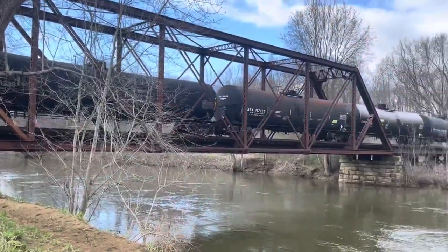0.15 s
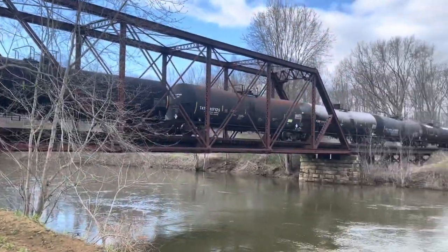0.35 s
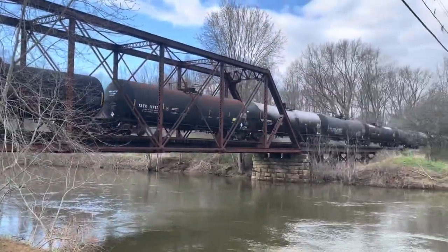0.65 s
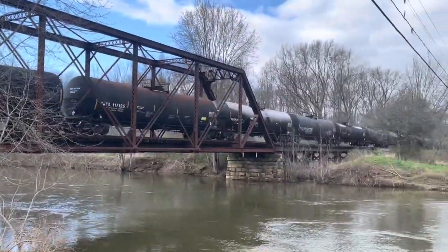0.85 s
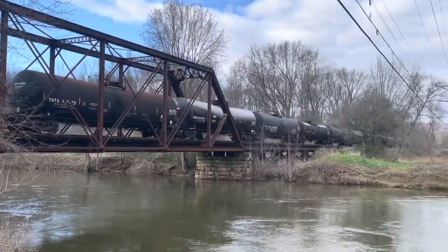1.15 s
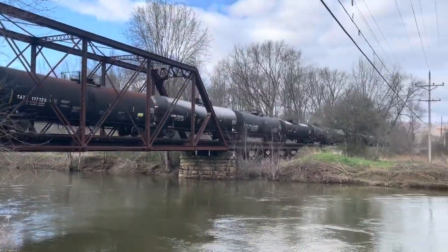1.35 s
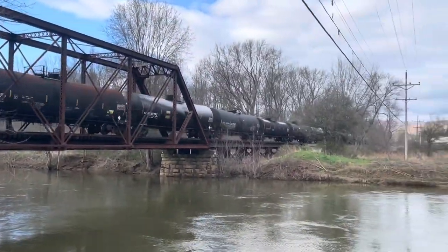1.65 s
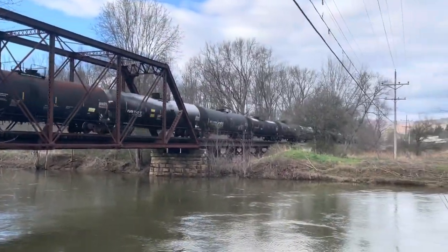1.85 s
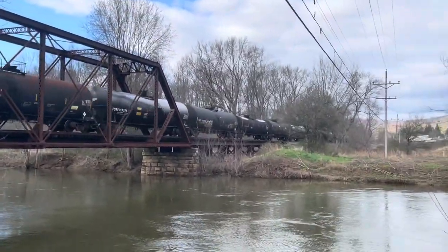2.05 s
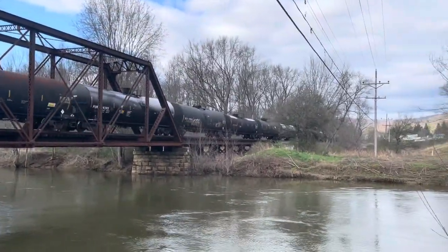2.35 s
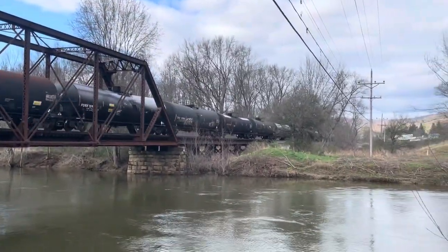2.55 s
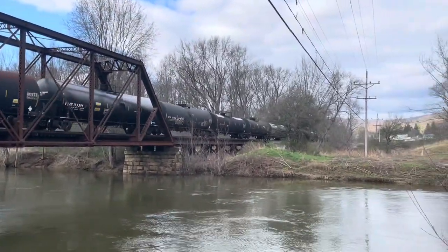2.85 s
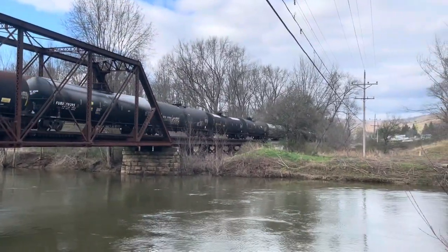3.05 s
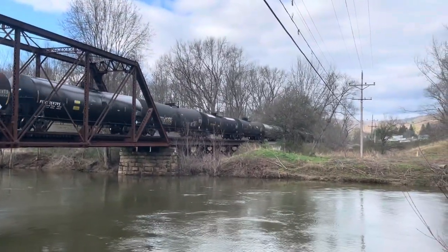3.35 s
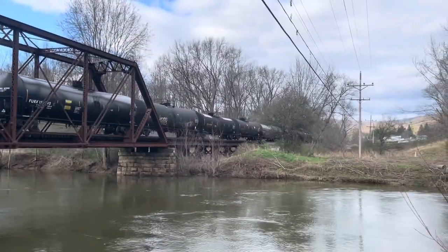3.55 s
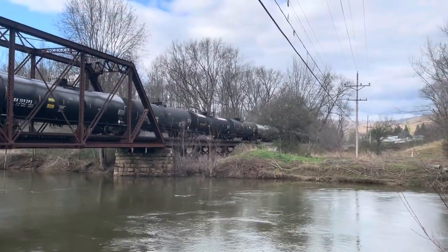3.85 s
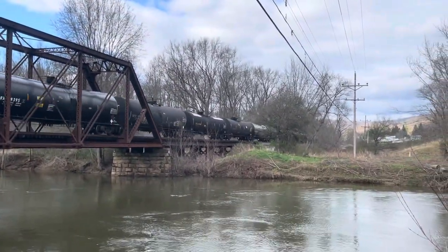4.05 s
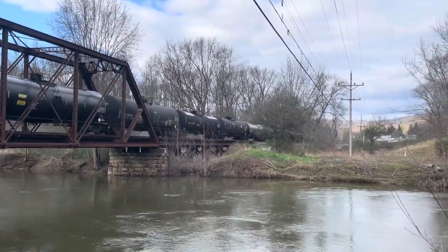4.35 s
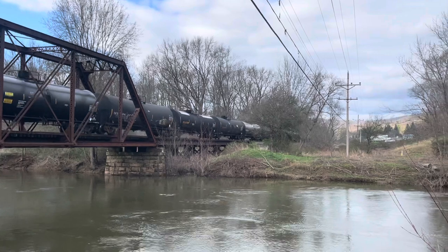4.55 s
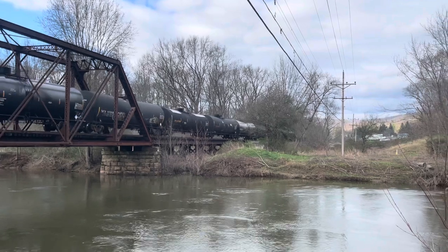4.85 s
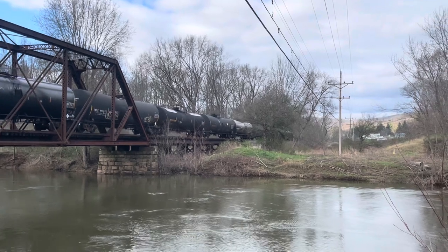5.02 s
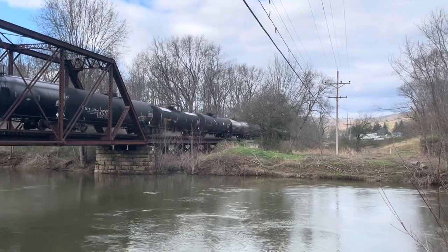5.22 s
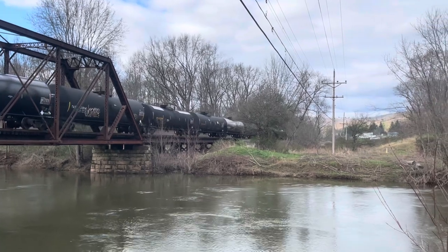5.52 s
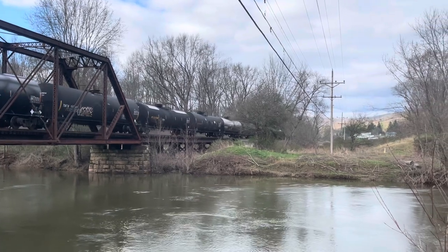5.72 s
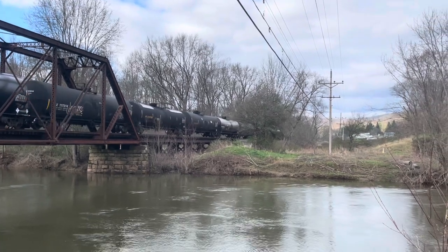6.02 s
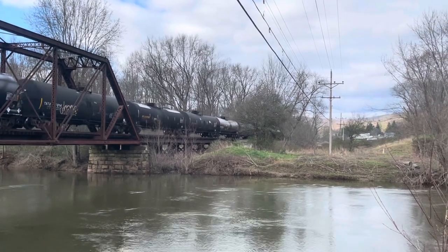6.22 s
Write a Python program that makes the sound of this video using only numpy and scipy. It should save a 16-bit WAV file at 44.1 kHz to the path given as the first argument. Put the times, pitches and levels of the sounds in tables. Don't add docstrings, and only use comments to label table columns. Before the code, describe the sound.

From 0 to about 6.4 seconds, a slow freight train is already crossing a steel bridge by a river, with no fade in or out. A low rumble around 60 to 120 Hz and midrange wheel roar fluctuate constantly, topped by fine steel scraping and airy hiss. At 0.1 to 0.3 s a thin high flange squeal chirps. Knocks and short clanks, mostly 500 to 1100 Hz, fall irregularly several times a second. At 1.16 s a coupler slams, dry and hard, loudest of all. Knocks continue around 2.4 s and 3 s with bright plate rattles. A deep thump lands near 3.9 s; from 4.2 to 4.6 s hoarse grinding and clustered girder thuds build up. Faint squeals and stronger hiss follow from 5.2 s, with another heavy thump at 5.8 s and clattering through the end. Close, open-air phone perspective, short diffuse bank reflections.

```python
import sys
import numpy as np
from scipy import signal
from scipy.fft import rfft, irfft, next_fast_len
from scipy.io import wavfile
from scipy.ndimage import uniform_filter1d

SR = 44100
rng = np.random.default_rng(int(sys.argv[2]) if len(sys.argv) > 2 else 0)


def to_wav(s):
    ch = np.atleast_2d(s).T
    pcm = np.round(np.clip(ch, -1, 1) * 32767)
    wavfile.write(sys.argv[1], SR, pcm.astype(np.int16))


def convert_level_to_amplitude(level_db):
    exponent = np.asarray(level_db, float) / 20
    return 10 ** exponent


N = 281259
TIME = np.arange(N) / SR
SIZE = next_fast_len(N)
HZ = np.arange(SIZE // 2 + 1) * SR / SIZE + 1e-3


def at_level(x, db):
    return x * convert_level_to_amplitude(db) / np.sqrt(np.mean(x ** 2))


def along(table, column=1):
    table = np.array(table)
    return np.interp(np.log(HZ), np.log(table[:, 0]), table[:, column])


def shape(x, gain):
    return irfft(rfft(x, SIZE) * gain, SIZE)[:N]


def resonance(hz, width_hz, at):
    return 1 / (1 + 1j * (at - hz ** 2 / at) / width_hz)


def walk(rate_hz):
    hold = int(SR / rate_hz)
    steps = np.repeat(rng.standard_normal(N // hold + 1), hold)
    slow = uniform_filter1d(uniform_filter1d(steps, hold), hold)[:N]
    return slow / slow.std()


def add(out, s, sound):
    i = int(s * SR)
    out[i:i + len(sound)] += sound[:len(out) - i]


def pings(count, lowest_hz, octaves, t60=0.1, spread_db=2):
    out, t = np.zeros(SIZE), np.arange(3000) / SR
    fade = (1 - np.exp(-t / 0.00072)) * convert_level_to_amplitude(-60 * t / t60)
    for when, pitch, size in rng.random((count, 3)):
        hz = lowest_hz * 2 ** (octaves * pitch)
        loudness = convert_level_to_amplitude(-spread_db * np.log(size + 0.039))
        add(out, when * N / SR, loudness * fade * np.sin(2 * np.pi * hz * t))
    return out


def swells(table):
    out = np.zeros((len(table[0]) - 2, N))
    for s, length, *db in table:
        span = slice(max(int((s - length / 2) * SR), 0), int((s + length / 2) * SR))
        out[:, span] += np.outer(db, np.cos(np.pi * (TIME[span] - s) / length) ** 2)
    return out


# t/s, level/dB
WEIGHT = [(0.0, -0.2), (.58, 3), (1.16, -1.04), (1.74, -0.56), (2.32, -2.5), (2.9, -1.6), (3.48, -4),
          (4.06, 2.5), (4.64, 4), (5.22, 2), (5.8, 0.2), (6.38, 4)]
FOLLOWS = [1.17, 1.7, 0.19, 1.5, 1.23, -0.55]
# middle t/s, length/s, swell level/dB
BOOMS = [(.15, .13, -1), (.3, 0.12, -5), (.4, 0.15, 3), (.85, .4, 1), (1.11, 0.067, -6), (1.26, 0.29, 7.5),
         (1.59, 0.37, 5), (1.85, 0.28, 3), (2.19, 0.2, 5.5), (2.51, 0.14, 2.5), (3.6, 0.15, -6),
         (3.79, 0.34, 6), (3.9, .18, 5), (4.24, .12, 6), (4.38, 0.064, -1), (4.42, 0.32, 7),
         (4.56, 0.11, 6), (5.08, .4, 1), (4.6, .06, -4), (5.5, 0.087, 5), (5.91, 0.26, 3.5)]
# middle t/s, length/s, deck swell level/dB, rail swell level/dB
ROUGH_RAIL = [(0.11, 0.26, 1.5, 2.5), (0.37, 0.089, -1, -5), (0.66, 0.067, 1, 4), (0.83, 0.11, 3.5, -1),
              (0.96, 0.41, 10, 5), (1.23, 0.3, 6.5, 6), (1.56, 0.092, 6.5, 5), (1.74, 0.12, 6, 2.0),
              (1.88, 0.12, 12, 0.5), (2.12, 0.3, 10, 9), (2.48, 0.38, 3, 3), (2.65, 0.17, 4, 1.5),
              (2.84, 0.17, -2, 4), (3.03, 0.26, 4.5, 7), (3.33, 0.57, 7, 6.5), (3.71, 0.39, 11, 10),
              (3.88, 0.15, 3, 2), (4.01, 0.1, 5, 2), (4.24, 0.7, 5, 3), (4.58, 0.46, 3, 5),
              (4.96, 0.41, 5, 9), (5.48, 0.13, 8.5, 4.5), (5.84, 0.39, 9, 7.5), (5.98, 0.35, 3.5, -3),
              (6.18, 0.34, 8.5, 3.5), (.73, 0.089, -4, -7), (2.365, 0.072, -2, -2), (2.965, 0.075, -6, -5),
              (3.57, .08, -5.5, -2), (4.5, 0.068, -7, -7), (2.27, .16, 4, 0), (5.64, .2, 4, 0),
              (3.2, .12, -4, 0), (5.77, 0.075, -5, -4)]
# middle t/s, length/s, scrape swell level/dB, hiss swell level/dB
FLANGE_RUBS = [(0.17, 0.65, 4, 7), (0.54, 0.15, 3.0, 10), (0.99, 0.35, 2.5, 4.5), (1.18, 0.29, 3.5, 3),
               (1.36, 0.44, 5.5, 5), (1.57, 0.16, 4.5, 8), (1.76, 0.51, 4, 4), (2.08, 0.31, 10.5, 9),
               (2.47, 0.33, 6, 8.5), (2.63, 0.046, 1.5, 8), (2.82, 0.15, 5.5, 6), (3.03, 0.42, 2.0, 7),
               (3.29, 0.41, 1.5, 6.5), (3.63, 0.17, 3.5, 5.5), (3.78, 0.29, 4.5, 5), (3.98, 0.048, 6.5, 12),
               (4.208, 0.1, 6.5, 12), (4.31, 0.17, 6.5, 9), (4.58, 0.12, 1.5, 3), (4.83, 0.24, 5, 5),
               (4.96, 0.15, 5.5, 11), (5.16, 0.44, 2, 10), (5.47, 0.41, 4, 10.5), (5.73, 0.36, 6, 11),
               (6.0, 0.45, 4.5, 11), (6.23, 0.39, 4.5, 11)]
# middle t/s, length/s, scrape level/dB, hiss level/dB
FLANGE_LIFTS = [
    (1.1, 0.074, -5, -4),
    (2.3, 0.15, -0.5, -1.5),
    (2.58, 0.1, -3, -9),
    (3.553, .12, -2.5, 3),
    (3.902, 0.13, -1, -9),
    (4.107, 0.16, -2, -10),
    (4.44, 0.24, -2, -5),
]


def shaking():
    girders, = swells(BOOMS)
    deck, rail = swells(ROUGH_RAIL)
    scrape, hiss = swells(FLANGE_RUBS + FLANGE_LIFTS)
    discs = 0.26 * rail + 0.88 * scrape
    weight_db = np.interp(TIME, *np.transpose(WEIGHT))
    return np.array([girders, deck, rail, discs, scrape, hiss]) + np.outer(FOLLOWS, weight_db)


PART_HZ = [120, 560, 930, 2200]
# f/Hz, level/dB
ROLLING_COLOUR = [(15, -41), (25, -25.5), (59, -1), (117, -0.5), (178, -6.5), (269, -8), (331, -6),
                  (468, -9), (833, -9.5), (957, -4), (1480, -13.5), (1700, -19), (2410, -22.5),
                  (6200, -36.5), (8060, -49), (13600, -120)]
# f/Hz, width/Hz, level/dB
RINGING = [
    (118, 31, -3),
    (700, 17.5, -1.5),
    (1000, 22, -27),
    (1150, 44, -11.5),
    (1950, 127, -1),
    (2420, 160, -4),
    (2690, 180, -2.5),
]
# f/Hz, width/Hz, depth 0-1
WATER_DIP = (1650, 99, 0.38)


def rolling(drive_db, ping_db=-15, shared_db=0.81, own_db=1.17, depth=0.89):
    mean_db = 10 * np.log10(np.mean(10 ** (drive_db / 10), axis=1, keepdims=True))
    swing = depth * (drive_db - mean_db)
    grain = rng.standard_normal(SIZE) + convert_level_to_amplitude(ping_db) * pings(count=900, lowest_hz=600, octaves=2.3)
    modes = sum(convert_level_to_amplitude(db) * np.abs(resonance(hz, width, HZ)) for hz, width, db in RINGING)
    dip_hz, dip_width_hz, dip_depth = WATER_DIP
    mirror = 1 - dip_depth * np.abs(resonance(dip_hz, dip_width_hz, HZ)) ** 2
    rough = rfft(grain) * convert_level_to_amplitude(along(ROLLING_COLOUR)) * (1 + modes) * mirror
    out, shared = 0, walk(10)
    for hz in 25 * 2 ** (np.arange(23) / 3):
        slot = np.cos(np.pi / 2 * np.clip(3 * np.log2(HZ / hz), -1, 1)) ** 2
        nearness = [np.interp(np.log(hz), np.log(PART_HZ), part) for part in np.eye(len(PART_HZ))]
        band_db = nearness @ swing + shared_db * shared + own_db * walk(18)
        out = out + irfft(rough * slot, SIZE)[:N] * convert_level_to_amplitude(band_db)
    return at_level(out, -32.5)


# f/Hz, level/dB
SCRAPE_COLOUR = [(2500, -14.5), (3300, -2.5), (4500, -3), (6000, -4.5), (7500, -5.5), (8200, -11.5),
                 (9000, -31)]
# f/Hz, level/dB
HISS_COLOUR = [(6000, -24.5), (7500, -16), (8500, -2), (9500, -4), (11000, -12), (13000, -28), (14000, -43),
               (14600, -55), (15300, -66)]


def sliding(drive_db, ping_db=-11, scrape_db=-54, hiss_db=-67):
    ringing = pings(count=1500, lowest_hz=2995, octaves=2.2)[:N]
    grain = rng.standard_normal(N) + convert_level_to_amplitude(ping_db) * ringing
    flutter = convert_level_to_amplitude(1.04 * walk(30) + 1.2 * walk(15))
    scrape = at_level(shape(grain, convert_level_to_amplitude(along(SCRAPE_COLOUR))), scrape_db)
    hiss = at_level(shape(grain, convert_level_to_amplitude(along(HISS_COLOUR))), hiss_db)
    return flutter * np.sum([scrape, hiss] * convert_level_to_amplitude(drive_db), axis=0)


# t/s, length/s, f/Hz, width/Hz, level/dB
SQUEALS = [(.112, 0.051, 4680, 30, -46), (.14, .09, 4705, 25, -42.5), (.2, .11, 4660, 35, -50),
           (.11, .05, 3400, 60, -53), (.11, .12, 6546, 60, -62), (.138, 0.05, 7420, 60, -45),
           (0.17, 0.068, 7350, 60, -47), (.106, .03, 9010, 43, -49), (.138, .025, 9000, 70, -50),
           (0.18, .045, 9010, 70, -54), (0.15, .05, 10700, 60, -57), (1.627, .05, 11600, 80, -86),
           (2.617, 0.1, 10050, 80, -65), (5.17, 0.16, 5710, 44, -57.5), (5.38, 0.31, 6400, 40, -52),
           (5.49, 0.18, 2510, 53, -45), (6.8, 0.17, 2360, 54, -45), (5.67, 0.15, 2100, 70, -46),
           (5.98, .1, 4620, 70, -55), (6.03, .09, 2800, 70, -48), (6.23, 0.15, 2300, 80, -46),
           (5.3, .3, 2975, 66, -58), (5.3, 0.33, 2000, 94, -62), (5.4, 0.3, 2900, 940, -44.5),
           (1.4, 0.33, 2400, 200, -47.5), (2.462, 0.11, 2720, 150, -48), (3.178, 0.037, 2130, 200, -43),
           (0.001, .09, 3500, 700, -48), (4.4, 0.24, 1500, 320, -44.5), (5.68, 0.071, 1800, 330, -38),
           (4.2, 0.07, 2650, 810, -35), (4.26, 0.15, 2600, 540, -38.5), (4.27, 0.12, 3600, 950, -40.5),
           (4.27, 0.12, 1400, 330, -34), (5.6, 0.045, 1600, 200, -47), (.46, 0.2, 4600, 1700, -47.5),
           (6.198, 0.074, 11320, 50, -56)]


def squeals(edge_s=.015, steady_hz=32, sag_per_s=.03):
    out = np.zeros(N)
    for s, length, hz, width_hz, db in SQUEALS:
        t = np.arange(int(length * SR)) / SR
        span = int(SR / width_hz / 1.6)
        noise = rng.standard_normal((2, 16384))
        slip = uniform_filter1d(uniform_filter1d(noise, span), span)[:, :len(t)] * span ** .5
        gate = np.clip(np.minimum(t / edge_s, 1.3 * (1 - t / length)), 0, 1)
        phase = 2 * np.pi * hz * (t - sag_per_s * t ** 2 / 2)
        tone = (steady_hz / width_hz + slip[0]) * np.sin(phase) + slip[1] * np.cos(phase)
        add(out, s, gate * at_level(tone, db))
    return out


def single_modes(table, rise_s, t60, gain_db):
    out, t = np.zeros(N), np.arange(6000) / SR
    fade = (1 - np.exp(-t / rise_s)) ** 2 * convert_level_to_amplitude(-60 * t / t60)
    for s, db, hz in table:
        tone = fade / fade.max() * np.sin(2 * np.pi * hz * t)
        add(out, s - 2.4 * rise_s, convert_level_to_amplitude(db + gain_db) * tone)
    return out


# loudest t/s, peak level/dB, f/Hz
CLANKS = [(0.102, -38.5, 900), (0.314, -36.5, 734), (0.353, -40, 730), (0.482, -40, 1010),
          (0.521, -36.5, 344), (0.537, -35.5, 975), (0.564, -37, 620), (0.579, -38, 1435),
          (0.886, -35, 1025), (1.009, -29, 650), (1.253, -32, 1130), (1.374, -37.5, 970), (1.672, -36, 800),
          (2.035, -31, 967), (2.064, -37.5, 1540), (2.1, -39, 1500), (2.302, -37.5, 970), (2.448, -33, 820),
          (2.523, -30, 971), (2.627, -36, 983), (2.881, -34.5, 983), (2.998, -32, 930),
          (3.141, -31.5, 1003), (3.261, -32, 946), (3.288, -34.5, 950), (3.364, -34, 1025),
          (3.67, -31, 803), (3.804, -37, 733), (3.863, -38, 1050), (4.108, -33, 600), (4.135, -40, 1530),
          (4.158, -32, 956), (4.22, -33, 657), (4.237, -40, 2650), (4.295, -37, 650), (4.325, -34.5, 1110),
          (4.391, -38, 1460), (4.475, -37, 1027), (4.475, -29.5, 666), (4.572, -30.5, 930),
          (4.638, -32, 550), (4.705, -35, 1010), (4.824, -31.5, 1060), (4.828, -36, 1860),
          (5.154, -37, 1133), (5.356, -32.5, 750), (5.406, -31.5, 954), (5.475, -28, 723), (5.5, -42, 2330),
          (5.742, -36, 557), (5.744, -37, 1165), (5.931, -42.5, 1910), (5.992, -37, 1013),
          (6.055, -34, 670), (6.06, -33, 990), (6.106, -40, 2390), (6.115, -31.5, 390), (6.175, -42, 1840),
          (6.232, -34, 1154), (6.257, -32, 1064)]


def clanks():
    return single_modes(CLANKS, rise_s=.003, t60=.075, gain_db=4.04)


def blows(table, sharp, rise_s, gain_db, strike=1.4):
    out, t = np.zeros(N), np.arange(16384) / SR
    at = np.arange(len(t) // 2 + 1) * SR / len(t) + 1e-3
    for s, db, hz, t60 in table:
        fade = (1 - np.exp(-t / rise_s)) * convert_level_to_amplitude(-60 * t / np.clip(t60, .02, .4))
        chatter = rng.standard_normal(len(t)) * fade
        chatter[int(rise_s * SR)] += strike * np.sqrt(SR / hz)
        burst = irfft(rfft(chatter) * resonance(hz, hz / sharp, at) ** 2)
        add(out, s, burst * convert_level_to_amplitude(db + gain_db) / np.abs(burst).max())
    return out


# t/s, peak level/dB, f/Hz, t60/s
KNOCKS = [(0.145, -23, 920, 0.16), (0.281, -20, 970, 0.088), (0.433, -25.5, 1040, 0.2),
          (0.644, -19.5, 550, 0.15), (0.763, -19.5, 910, 0.082), (0.923, -16, 840, 0.09),
          (1.007, -20, 647, 0.1), (1.135, -22, 883, 0.13), (1.568, -22, 993, 0.13), (1.627, -24, 1020, .08),
          (1.784, -27, 966, .1), (2.019, -27, 1040, .15), (2.104, -22, 990, .1), (2.43, -25, 764, 0.11),
          (2.623, -23, 1010, 0.11), (3.055, -21, 1020, .08), (3.121, -22, 1100, 0.11),
          (3.285, -20, 804, .15), (3.36, -22, 1010, 0.19), (3.43, -25, 750, .1), (3.606, -23, 964, .15),
          (4.898, -21, 660, .1), (4.938, -18, 980, .1), (5.441, -21, 966, .08), (5.34, -22, 730, 0.17),
          (4.97, -21, 343, 0.19), (5.8, -19, 974, 0.17), (5.895, -26, 900, .1), (6.289, -18, 958, .1),
          (1.872, -18, 710, 0.032), (2.135, -22, 1060, 0.12), (2.407, -15.5, 885, 0.23),
          (2.508, -18.5, 920, 0.29), (2.774, -20.5, 890, 0.28), (2.903, -19.5, 890, 0.14),
          (2.995, -21.5, 533, 0.19), (3.655, -25, 477, 0.15), (3.748, -19.5, 1150, 0.16),
          (3.996, -18, 550, 0.11), (4.154, -19, 970, 0.084), (4.459, -20, 660, 0.092),
          (4.524, -16.5, 550, 0.17), (4.57, -22, 370, 0.2), (4.606, -15.5, 600, 0.045),
          (4.83, -19.5, 700, 0.25), (4.947, -19, 318, 0.22), (5.107, -20, 724, 0.13),
          (5.31, -22, 834, 0.27), (5.47, -18, 700, 0.1), (5.808, -17.5, 850, 0.15),
          (6.051, -25, 680, 0.056), (6.174, -19.5, 490, 0.22), (6.24, -20, 251, .2)]


def knocks():
    return blows(KNOCKS, sharp=3.03, rise_s=0.00168, gain_db=-5.5)


# t/s, peak level/dB, f/Hz, t60/s
THUMPS = [(0.266, -22.5, 81.5, 0.39), (0.39, -21, 90, 0.2), (0.928, -22.5, 107, 0.3),
          (1.284, -23, 109, 0.29), (1.344, -22, 128, 0.45), (1.637, -29, 115, 0.55), (2.151, -28, 130, 0.3),
          (3.754, -21, 98, 0.23), (3.875, -15, 131, 0.2), (4.018, -33, 67, 0.17), (4.224, -24, 96, 0.27),
          (4.34, -25, 114, 0.2), (4.438, -22, 89.5, 0.18), (4.536, -21, 124, 0.16), (5.051, -32, 115, 0.33),
          (5.473, -26, 70, 0.16), (5.632, -33, 111, 0.42), (5.84, -15.5, 125, 0.43), (5.931, -22, 79, 0.3),
          (6.122, -21, 110, 0.26)]


def thumps():
    return blows(THUMPS, sharp=4.3, rise_s=0.0032, gain_db=-9.0)


# t/s, peak level/dB, f/Hz, t60/s
RATTLES = [(0.2942, -28, 2150, 0.2), (0.4354, -24, 1760, 0.093), (0.9993, -23, 1760, 0.13),
           (1.5434, -27, 1930, 0.13), (1.73, -36, 2080, 0.21), (2.0163, -25, 1710, 0.088),
           (0.9203, -27, 1900, .08), (1.1722, -24, 1890, .08), (2.0911, -30, 1840, .1),
           (2.4044, -29, 1990, .1), (2.7786, -34, 1910, 0.074), (2.816, -25, 1840, .1),
           (2.81, -32, 3800, .12), (4.0726, -29, 1890, .06), (4.8264, -26, 3800, .1),
           (4.9402, -30, 1870, .08), (5.455, -27, 2330, .1), (5.8925, -29, 2340, 0.11),
           (6.097, -26, 4000, 0.088), (6.1714, -32, 1800, .08), (6.2302, -26, 2690, .1),
           (3.983, -31, 4500, .06), (4.27, -25, 1400, .15), (2.6247, -31, 2350, 0.075),
           (2.6903, -31, 2630, 0.14), (3.6428, -37, 1870, 0.085), (3.7404, -29, 2090, 0.12),
           (3.7658, -26.5, 1900, 0.15), (3.9814, -36, 2050, 0.14), (4.132, -24, 1730, 0.057),
           (4.2667, -25, 2770, 0.091), (3.262, -31, 2060, 0.12), (4.4747, -27, 2570, 0.12),
           (4.5283, -24, 1980, 0.12), (4.8243, -23, 1860, 0.08), (5.0689, -24, 1890, 0.065),
           (5.3098, -32, 1910, 0.1), (5.3817, -30, 1950, 0.12), (5.522, -29, 2500, 0.087),
           (5.672, -27, 2310, 0.36), (5.8007, -31, 1700, 0.12), (6.0975, -20.5, 2370, 0.14)]


def rattles():
    return blows(RATTLES, sharp=2.07, rise_s=0.00156, gain_db=-6.0)


# delay t/s, f/Hz, level/dB, t60/s, pitch lift at the start
SLAM = [
    (0, 690, -8.5, .035, .4),
    (.002, 68, -18, .14, 4),
]
# delay t/s, contact/s, f/Hz, level/dB
CRACK = (.0019, .0009, 920, -9.6)


def slam(slam_s=1.1616, rise_s=.0016, settle_s=.004):
    out, t = np.zeros(N), np.arange(12000) / SR
    swell = (1 - np.exp(-t / rise_s)) ** 3
    for late, hz, db, t60, lift in SLAM:
        turns = hz * (t + lift * settle_s * (1 - np.exp(-t / settle_s)))
        add(out, slam_s + late, convert_level_to_amplitude(db - 60 * t / t60) * swell * np.sin(2 * np.pi * turns))
    late, contact_s, hz, db = CRACK
    since = t[:200] - late
    crack = np.exp(-(since / contact_s) ** 2) * np.cos(2 * np.pi * hz * since)
    add(out, slam_s, -convert_level_to_amplitude(db) * crack)
    return out


# loudest t/s, peak level/dB, f/Hz
THUDS = [
    (1.568, -29.5, 124),
    (3.806, -28.5, 89),
    (4.28, -29.5, 126),
    (4.357, -22.5, 118),
    (4.452, -24.5, 90),
    (4.503, -28.5, 105),
    (4.551, -20.5, 118),
    (5.103, -29, 109.5),
    (5.347, -32, 112),
    (6.274, -29, 125.4),
]


def thuds():
    return single_modes(THUDS, rise_s=.006, t60=.13, gain_db=2.1)


BANK_LAGS_S = [.0031, .0077, .0131, .0223]


def bank_echo(train, scatter=0.69):
    delays = [np.exp(-2j * np.pi * HZ * lag) for lag in BANK_LAGS_S]
    all_pass = [(d - scatter) / (1 - scatter * d) for d in delays]
    return shape(train, np.prod(all_pass, axis=0))


def scene():
    drive_db = shaking()
    train = rolling(drive_db[:4]) + sliding(drive_db[4:]) + squeals()
    train = train + clanks() + knocks() + thumps() + rattles() + slam() + thuds()
    echo = bank_echo(train)
    return np.array([train + echo, train - echo])


# f/Hz, lead/turns
LEAD = [(6150, 0), (6300, -.08), (7800, -.5), (8400, -.5), (11000, -1), (12500, -1), (14000, -1.5)]
# f/Hz, left minus right level/dB, bank echo level/dB
WIDTH = [(660, 0, -64), (840, -1.1, -25), (975, -2.5, -12), (1390, 1.5, -7), (1740, -3.5, -3),
         (2100, 1, -9.5), (2900, 1, -15.5), (3520, 1.1, -28), (6000, 1.1, -40), (6600, -2.5, -38),
         (7320, 3, -8), (8080, 1.5, -24), (8260, -1.5, -39), (8620, -1, -9),
         (10800, 0, -12), (11100, 0, -48), (12300, 0, -38), (13200, 0, -21), (13800, 0, -50)]


def phone_ports(dry):
    direct, echo = (dry[0] + dry[1]) / 2, (dry[0] - dry[1]) / 2
    width = WIDTH
    echo = shape(echo, convert_level_to_amplitude(along(width, column=2)))
    turn = np.exp(1j * np.pi * np.interp(HZ, *np.transpose(LEAD)))
    lean = turn * convert_level_to_amplitude(along(width) / 2)
    return np.array([shape(direct + echo, lean), shape(direct - echo, 1 / lean)])


def low_pass(x):
    return signal.sosfilt(signal.butter(12, 15400, fs=SR, output="sos"), x)


def record(dry):
    ports = phone_ports(dry)
    return low_pass(ports)


dry = scene()
out = record(dry)
to_wav(out)
```